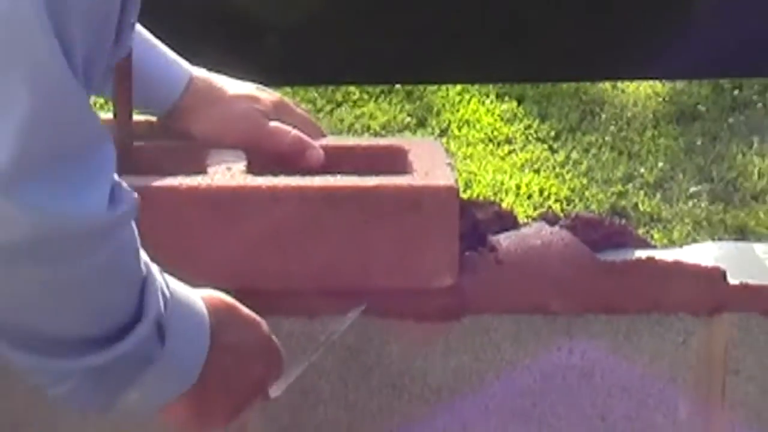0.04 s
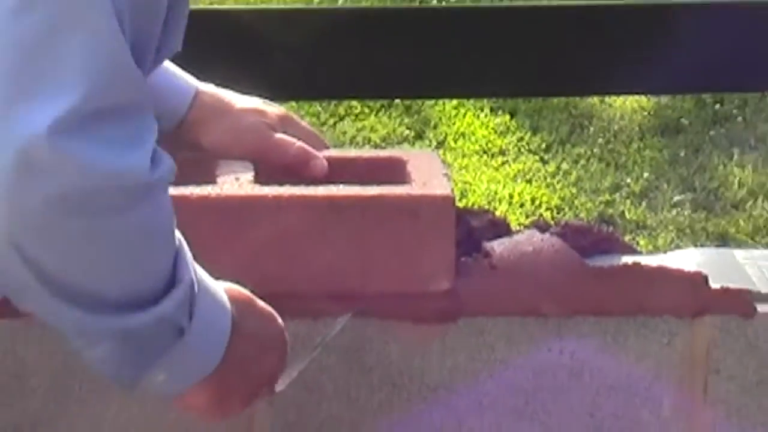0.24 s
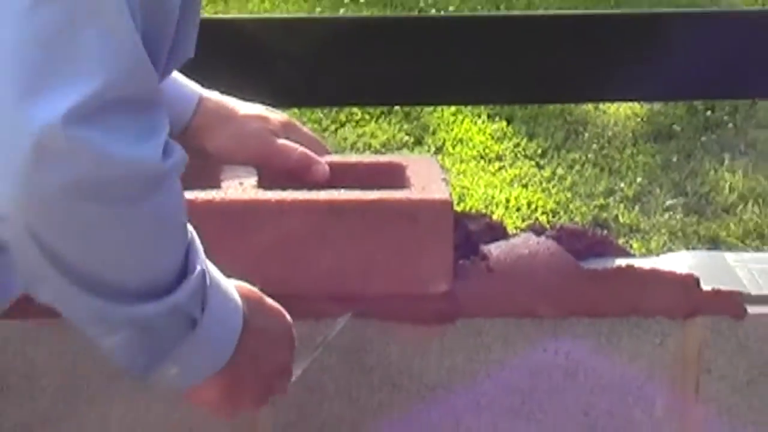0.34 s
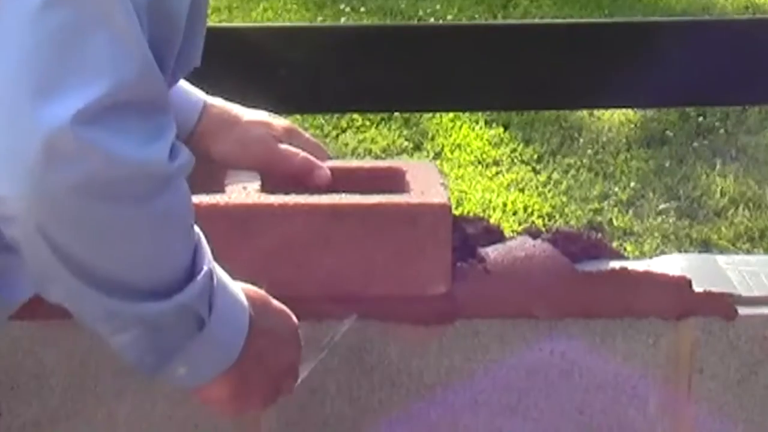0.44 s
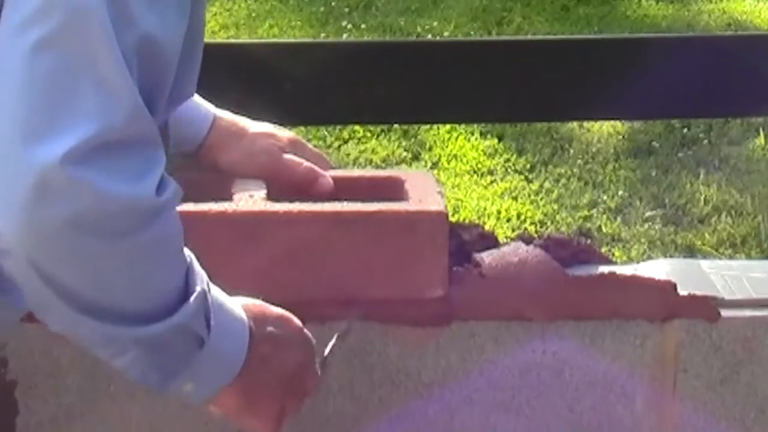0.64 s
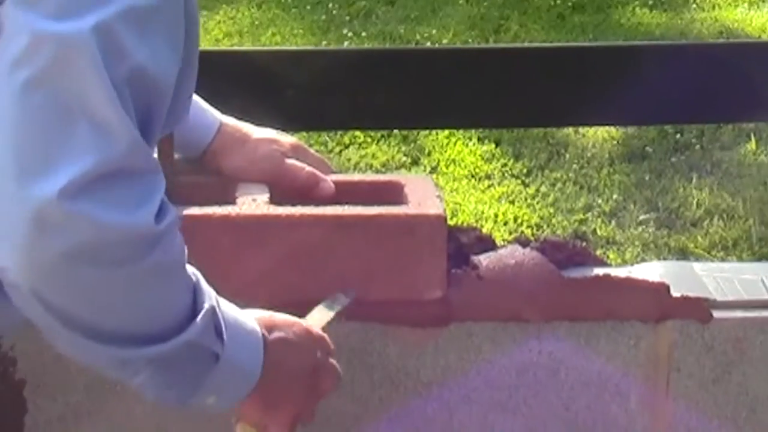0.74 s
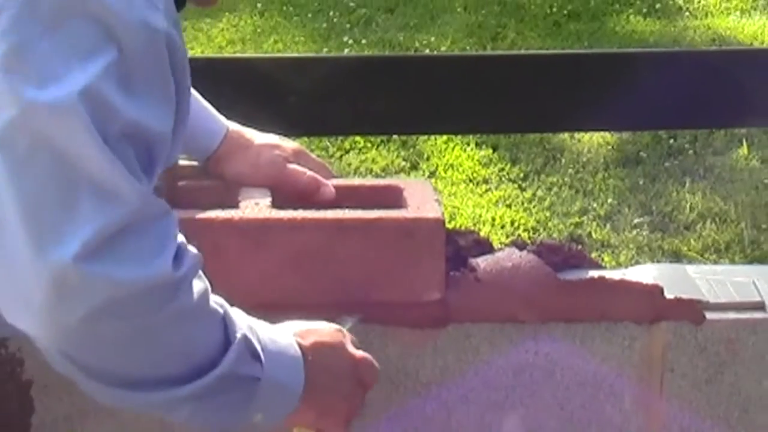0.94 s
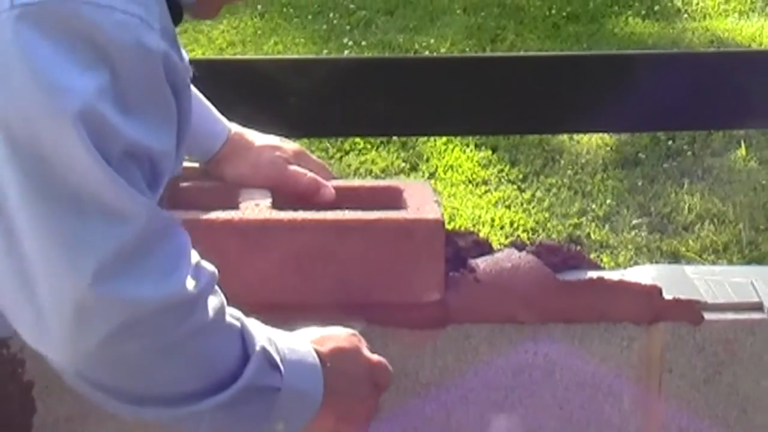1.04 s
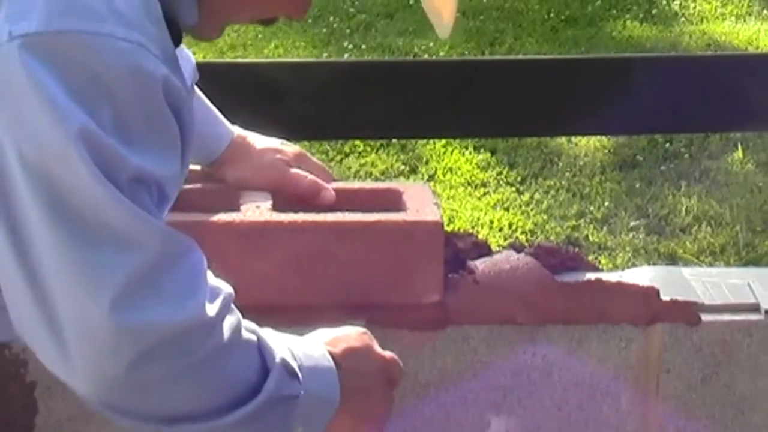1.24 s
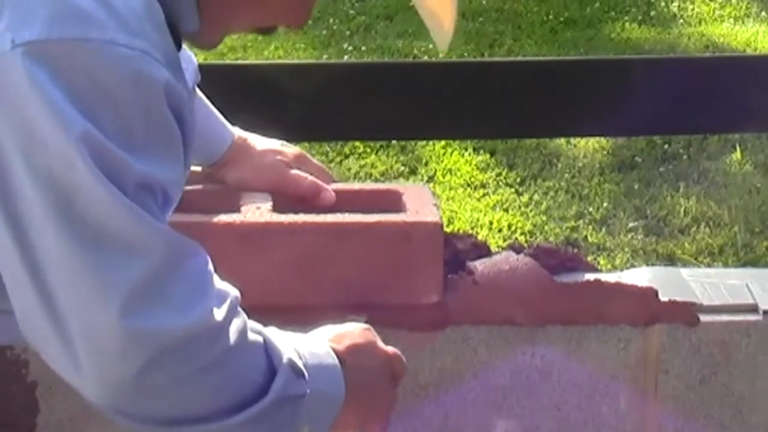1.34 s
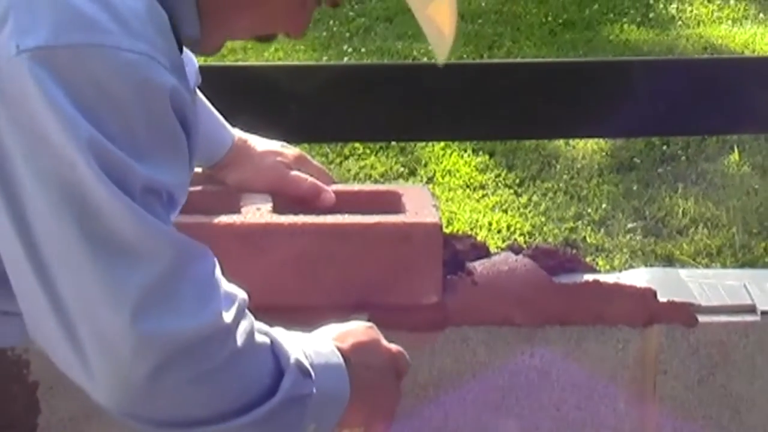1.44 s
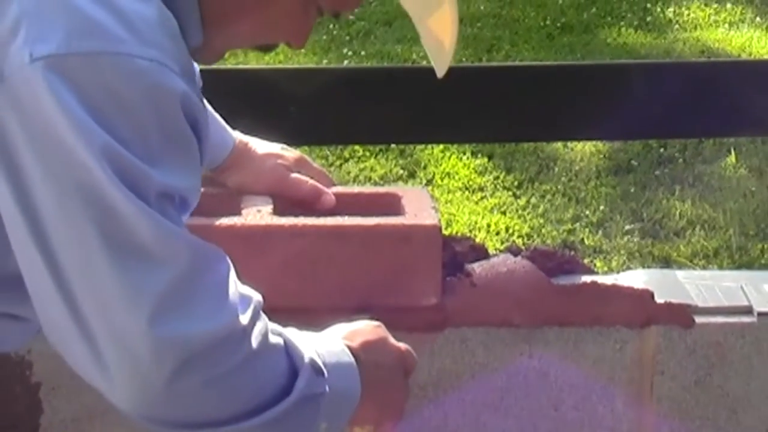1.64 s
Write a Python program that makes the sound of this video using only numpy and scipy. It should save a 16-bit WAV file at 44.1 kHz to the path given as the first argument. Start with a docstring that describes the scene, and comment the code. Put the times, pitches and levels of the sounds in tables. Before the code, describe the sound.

A steel tool clicks and scrapes against a concrete block over a steady outdoor hiss, ringing briefly at about 0.25 seconds. From 0.4 seconds a gust buffets the microphone with a low rumble and soft thumps, easing after one second. The tool slides quietly along the mortar, crushing a few grains, then catches with gritty scraping and ticks from 1.5 to 1.7 seconds.

```python
"""Outdoors, over a steady hiss, a steel pointing tool chatters against a concrete block.
At about a quarter of a second its blade springs free and rings. A gust then hits the
microphone with a low rumble and soft thumps. As the wind eases, the tool slides quietly
along the fresh mortar joint, crushing a few grains. From 1.5 s it catches and scrapes on sand."""
import sys
import numpy as np
from scipy import signal
from scipy.fft import rfft, irfft, next_fast_len
from scipy.io import wavfile
from scipy.ndimage import uniform_filter1d

SR = 44100
rng = np.random.default_rng(int(sys.argv[2]) if len(sys.argv) > 2 else 0)


def int16_out(signal):
    """Quantize to a 16-bit WAV file."""
    q = np.round(np.clip(np.atleast_2d(signal).T, -1, 1) * 32767)
    wavfile.write(sys.argv[1], SR, q.astype(np.int16))


N = 74970

# Tones of the blade pressed on the block: pitch_hz, level_db, ring_s (time to fall 60 dB)
PRESSED_BLADE_TONES = [(2121, 2.5, 0.018), (2334, -4, 0.009), (2420, -7.5, 0.0039), (2876, -2, 0.017),
                       (3680, -5, 0.017), (4630, -2.5, 0.019), (7600, -18, 0.048)]
# Low tones of tool and block knocking together: pitch_hz, level_db, ring_s
KNOCK_TONES = [(370, -0.5, 0.013), (451, 6, 0.015), (535, 6, .024), (767, -14, 0.011), (905, -8, 0.033),
               (1160, -23.5, 0.0093)]
# How strongly the gusts blow: time_s, level_db
GUST_LEVELS = [(0, -37), (.05, -44), (.25, -41), (.31, -32), (.385, -32), (.425, -31), (.47, -18),
               (.53, -25.5), (.62, -28.5), (.72, -32.5), (.82, -34), (.87, -32), (.98, -31.5), (1.13, -36),
               (1.21, -37), (1.3, -39), (1.52, -42.5), (1.7, -42.5)]


def from_db(db):
    """Turn decibels into a number to multiply by."""
    return 10 ** (np.asarray(db) / 20)


def rms_one(x):
    """Scale a sound to an average power of 1."""
    return x / np.sqrt(np.mean(x ** 2) + 1e-20)


def in_time(rows):
    """Join (time_s, value) points with straight lines, giving a value for every sample."""
    return np.interp(np.arange(N) / SR, *np.transpose(rows))


def coloured(x, spectrum):
    """Give a sound a tone colour: (pitch_hz, level_db) rows say how its pitches balance."""
    size = 2 * next_fast_len(N)
    hz, db = np.transpose(spectrum)
    all_hz = np.arange(size // 2 + 1) * SR / size
    gain = rms_one(from_db(np.interp(np.log(all_hz + 1), np.log(hz), db)))
    # Make the filter one-sided in time, so nothing sounds before its cause.
    cepstrum = irfft(np.log(gain))
    cepstrum[1:size // 2] *= 2
    cepstrum[size // 2 + 1:] = 0
    return irfft(rfft(x, size) * np.exp(rfft(cepstrum)))[:N]


def noise(spectrum):
    """Noise with the given tone colour and a power of 1."""
    return rms_one(coloured(rng.standard_normal(N), spectrum))


def evened(x, span_s):
    """Even out changes in loudness that are slower than span_s."""
    return x / np.sqrt(uniform_filter1d(x ** 2, max(int(span_s * SR), 2)) + 1e-9)


def drift(rate_hz):
    """A smooth random wobble with a typical size of 1."""
    r = np.exp(-2 * np.pi * rate_hz / SR)
    return rms_one(signal.lfilter([1], [1, -2 * r, r * r], rng.standard_normal(2 * N))[N:])


def ring(x, hz, ring_s):
    """Each push in x starts a tone that falls 60 dB in ring_s."""
    decay, angle = from_db(-60 / (ring_s * SR)), 2 * np.pi * hz / SR
    return signal.lfilter([0, np.sin(angle)], [1, -2 * decay * np.cos(angle), decay * decay], x + 1e-18)


def click(start_s):
    """A click one sample long."""
    return 1.0 * (np.arange(N) == int(start_s * SR))


def fade(start_s, fade_s):
    """A level that jumps to 1, then falls to about a third every fade_s."""
    age_s = np.arange(N) / SR - start_s
    return (age_s >= 0) * np.exp(-np.maximum(age_s, 0) / fade_s)


def struck(tones, push):
    """A rough push sets tones ringing, each as strongly as one click would at its level."""
    sound, jolts = 0, np.diff(push, prepend=0)
    for k, (hz, db, ring_s) in enumerate(tones):
        strength = from_db(db) * np.std(ring(click(0), hz, ring_s))
        sound = sound + (-1) ** k * strength * rms_one(ring(jolts, hz, ring_s))
    return sound


def steady_hiss():
    """Steady hiss: one part both ears share, and one that differs between them."""
    # Colour of the shared hiss: pitch_hz, level_db
    centre_colour = [(88, -27.5), (150, -9.5), (366, -12), (481, -11), (595, -23), (796, -14),
                     (1290, -18.5), (1540, -18.5), (2310, -19), (2500, -18), (15500, -34.5)]
    # Colour of the hiss that differs between the ears: pitch_hz, level_db
    side_colour = [(880, -12), (1500, -10), (2230, -23), (2430, -20), (3240, -21), (3570, -23), (5950, 0.5),
                   (15000, 1)]
    return from_db(-45.5) * noise(centre_colour), from_db(-61.5) * noise(side_colour)


def wind():
    """Wind on the microphone: a deep rumble, low buffeting and an uneven flutter above them."""
    # Loudness of the rumble: time_s, level_db
    rumble_levels = [(0.0, -25.5), (0.028, -34), (0.24, -33.5), (0.302, -21), (0.382, -30), (0.41, -24),
                     (0.496, -20), (0.524, -35), (0.756, -24.5), (1.406, -40.5), (1.424, -33), (1.7, -39.5)]
    # Loudness of the flutter: time_s, level_db
    flutter_levels = [(0, -46.5), (.27, -46.5), (.37, -43), (.43, -28), (.465, -33), (.51, -36), (.56, -36),
                      (.61, -53), (.65, -35), (.68, -77), (.80, -46), (.87, -40.5), (.96, -39), (1.08, -47),
                      (1.2, -45), (1.35, -50.5), (1.7, -44.5)]
    # Colours of the three layers: pitch_hz, level_db
    rumble_colour = [(4, -11), (14, -13), (25, 2.5), (42, -4.5), (60, -12.5), (100, -29), (250, -78.5)]
    buffet_colour = [(30, -28), (65, -4), (110, -1), (180, -9.5), (260, -13.5), (400, -23.5), (700, -33.5),
                     (1500, -45), (5000, -76)]
    flutter_colour = [(120, -31), (330, 2.5), (550, -5), (900, -14), (2000, -18.5), (5000, -29.5),
                      (12000, -48)]
    rumble = from_db(0.5 + in_time(rumble_levels)) * evened(noise(rumble_colour), span_s=0.061)
    buffet = from_db(in_time(GUST_LEVELS)) * evened(noise(buffet_colour), span_s=0.0313)
    lumpy = noise(flutter_colour) * from_db(0.5 * drift(rate_hz=21))
    flutter = from_db(-1.5 + in_time(flutter_levels)) * evened(lumpy, span_s=0.017)
    return rumble + buffet + flutter


def wind_swirls():
    """Swirling air that differs between the ears and follows the gusts."""
    # Colour of the swirls: pitch_hz, level_db
    swirl_colour = [(15, 32), (60, -21), (150, 5), (400, -3.5), (900, -13), (1400, -51), (2500, -47)]
    return from_db(-17.5 + in_time(GUST_LEVELS)) * noise(swirl_colour)


def wind_thumps():
    """A swirl hits the microphone: the pressure swings a few times, with a short puff of air."""
    # Swirls that hit: start_s, level_db, pitch_hz, puff_db
    hits = [(0.443, -7, 138, -30), (0.455, -6, 168, -23), (.471, -7.5, 87, -34), (.5015, -12, 154, -31),
            (0.5795, -7.5, 101, -21.5), (0.647, -18.5, 133, -26.5), (0.694, -16, 256, -31.5),
            (.847, -14.5, 86, -48), (.855, -13.5, 208, -55), (0.874, -18.5, 285, -30),
            (0.904, -18, 120, -36), (0.9187, -26, 298, -41), (1.182, -28, 139, -36), (1.2, -19, 125, -45),
            (1.222, -21, 89, -39), (1.293, -37, 212, -31), (1.423, -15.5, 214, -44), (1.429, -21, 69, -41)]
    # Colour of a puff: pitch_hz, level_db
    puff_colour = [(100, -19), (400, 10), (800, -3.5), (1600, -13.5), (3000, -26.5), (8000, -51)]
    ring_cycles = 2.56
    swings, puffs = 0, 0
    for start_s, db, hz, puff_db in hits:
        ring_s = ring_cycles / hz
        swing = ring(ring(click(start_s), hz, ring_s), hz, ring_s)  # rung twice: swells, then dies
        swings = swings + from_db(db) * swing / (np.abs(swing).max() + 1e-9)
        puffs = puffs + from_db(puff_db) * fade(start_s, fade_s=0.0031)
    return swings + coloured(puffs * rng.standard_normal(N), puff_colour)


def sand_scrape():
    """Sand grains slip under the steel and make it ring briefly; now and then one is crushed."""
    # Loudness of steel dragging over sand: time_s, level_db
    drag_levels = [(0, -75), (.18, -70), (.21, -45), (.24, -38), (.256, -48), (.30, -68), (.8, -62),
                   (.92, -54), (1.1, -62), (1.57, -59), (1.63, -47), (1.668, -41.5), (1.7, -44)]
    # Colour of the sand: pitch_hz, level_db
    sand_colour = [(300, 2.5), (550, 0.5), (1200, 0), (2200, -8.5), (3700, -4), (6000, -3.5), (8000, -9),
                   (10500, -13.5), (14000, -24), (16000, -37)]
    # Single grains crushed in the joint: start_s, level_db
    crunches = [(0.445, -33), (.694, -40), (.901, -40), (1.422, -35)]
    grains_per_s, spread_db = 5400, 2.5
    sizes = from_db(spread_db * np.minimum(rng.exponential(1, N), 4)) * rng.choice([-1, 1], N)
    grains = rms_one(sizes * (rng.random(N) < grains_per_s / SR))
    ringing = from_db(-4) * rms_one(struck(PRESSED_BLADE_TONES + KNOCK_TONES, grains))
    sliding = coloured(grains, sand_colour) + ringing
    crunch_level = sum(from_db(db) * fade(start_s, fade_s=0.0013) for start_s, db in crunches)
    crushed = coloured(crunch_level * rng.standard_normal(N), sand_colour)
    return from_db(in_time(drag_levels)) * sliding + crushed


def blade_ring():
    """The blade leaves the block and rings freely."""
    # Tones of the free blade: pitch_hz, level_db, ring_s
    free_tones = [(2232, -34.5, .44), (3251, -26, .25), (3368, -35, .13), (4483, -28.5, .19),
                  (5850, -35, .22), (7402, -38, .15), (2822, -45, .2), (4660, -23, .03), (4850, -15, .04),
                  (9060, -32, .07), (9254, -44, .1), (10720, -36, .04), (13250, -39, .035)]
    release = click(start_s=0.2445)
    return sum(from_db(db - 0.5) * ring(release, hz, ring_s) for hz, db, ring_s in free_tones)


def tool_hits():
    """Steel hits concrete and grinds for a moment: a bright tick, a blade clack and a low knock."""
    # Each hit on the block: start_s, grind_s, tick_db, clack_db, knock_db
    hits = [(0.113, 0.0029, -62, -60, -37), (0.1855, 0.0035, -30.5, -41.5, -51),
            (0.1880, 0.00033, -23, -31, -22.5), (0.2062, 0.00076, -20.5, -45, -34.5),
            (0.219, 0.0011, -32, -51, -62), (0.223, 0.00057, -15.5, -26, -30),
            (0.2275, 0.0005, -16, -17, -20), (0.2300, 0.0013, -36, -22.5, -17.5),
            (0.2440, 0.0015, -22.5, -29.5, -16), (0.2474, 0.00092, -24, -30, -26),
            (1.523, 0.0058, -42.5, -43, -36), (1.607, 0.0015, -35.5, -36, -35.5),
            (1.6125, 0.0034, -45, -35.5, -33.5), (1.619, 0.009, -47, -67, -25.5),
            (1.6744, 0.0022, -22.5, -28, -33), (1.682, 0.0072, -57, -47, -26),
            (1.685, 0.004, -36, -33, -29), (1.6972, 0.0032, -45, -28.5, -25)]
    # Colour of the tick: pitch_hz, level_db
    tick_colour = [(500, -61), (2000, 4), (3900, -4), (4850, -0.5), (5300, -2.5), (6300, -0.5), (7900, 2),
                   (9000, -3.5), (9800, -9), (11500, -14.5), (14500, -6.5), (16000, -28)]
    tail_db, tail_s = -21, 0.12  # a faint tail follows each tick and falls 60 dB in tail_s
    ticks, body = 0, 0
    for start_s, grind_s, tick_db, clack_db, knock_db in hits:
        grit = evened(rng.standard_normal(N), span_s=0.0005)
        grind = grit * fade(start_s, grind_s)
        tail = from_db(tail_db) * grit * fade(start_s, tail_s / np.log(1000))
        ticks = ticks + from_db(tick_db) * (grind + tail)
        push = click(start_s) + from_db(0.5) * grind / (np.linalg.norm(grind) + 1e-9)
        body = body + from_db(clack_db) * struck(PRESSED_BLADE_TONES, push)
        body = body + from_db(knock_db) * struck(KNOCK_TONES, push)
    return coloured(ticks, tick_colour) + body


def scene():
    """Everything sits near the centre; hiss, swirls and tool differ slightly between the ears."""
    tool = tool_hits() + blade_ring() + sand_scrape()
    gusts = wind() + wind_thumps()
    hiss_centre, hiss_side = steady_hiss()
    centre = hiss_centre + gusts + tool
    side = hiss_side + wind_swirls() + from_db(-42.5) * np.gradient(tool)
    return centre + side * np.array([[1], [-1]])  # added on the left, taken away on the right


def record(dry):
    """Soften the slowest swings, below 10 Hz, and steeply cut the treble above 15800 Hz."""
    low_cut = signal.butter(1, 10, "high", fs=SR, output="sos")
    treble_cut = signal.ellip(10, .1, 80, 15800, fs=SR, output="sos")
    return signal.sosfilt(treble_cut, signal.sosfilt(low_cut, dry))


dry = scene()
out = record(dry)
int16_out(out)
```